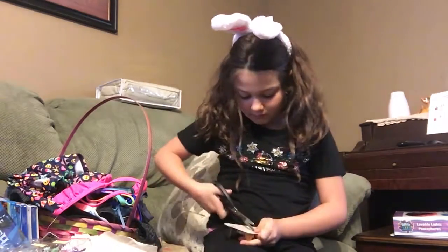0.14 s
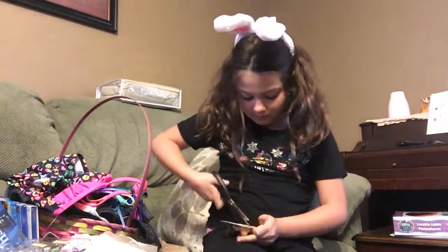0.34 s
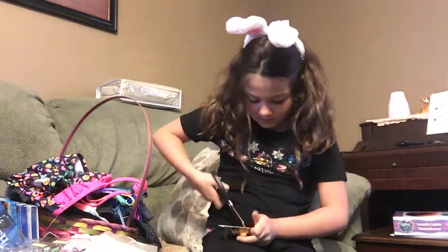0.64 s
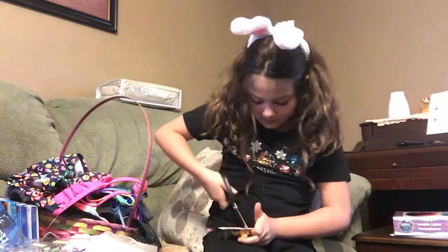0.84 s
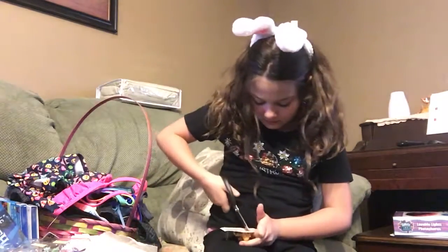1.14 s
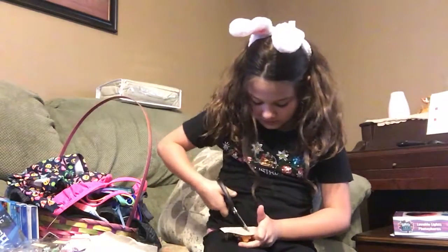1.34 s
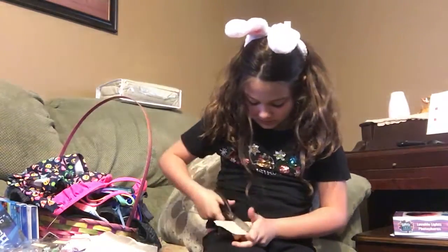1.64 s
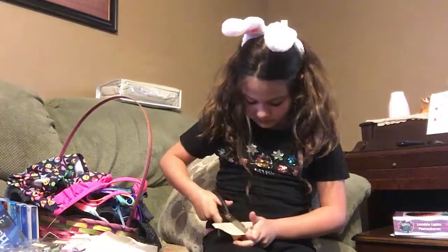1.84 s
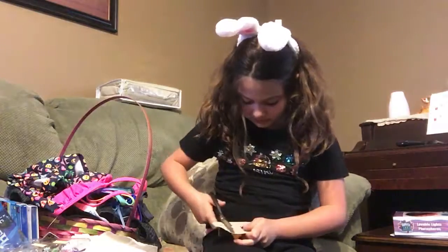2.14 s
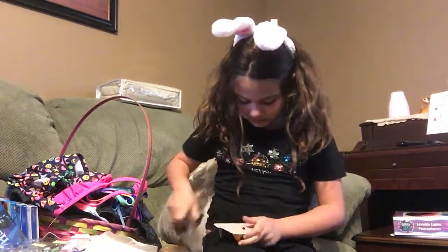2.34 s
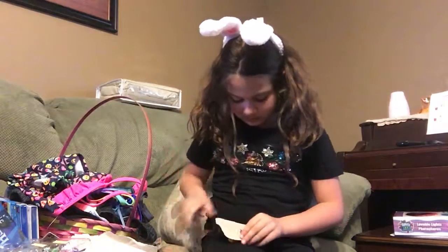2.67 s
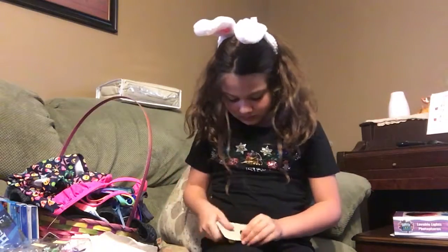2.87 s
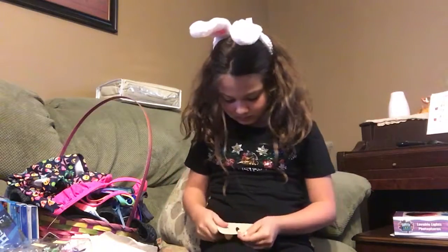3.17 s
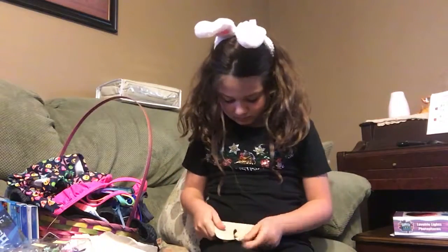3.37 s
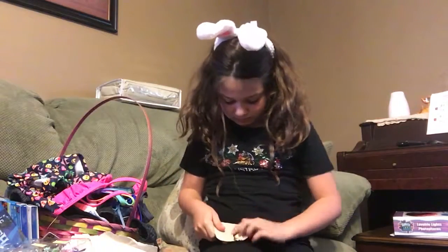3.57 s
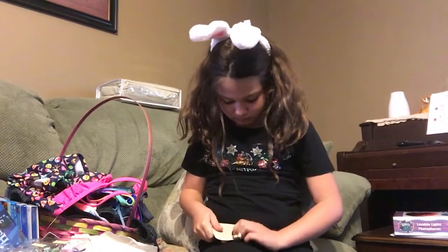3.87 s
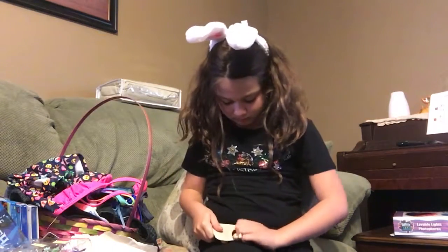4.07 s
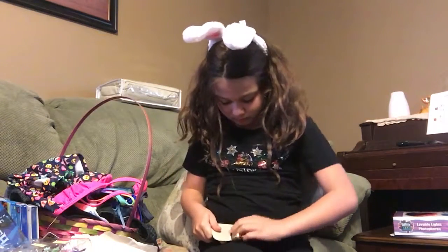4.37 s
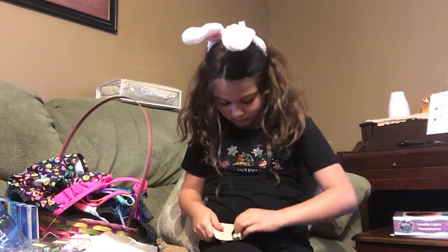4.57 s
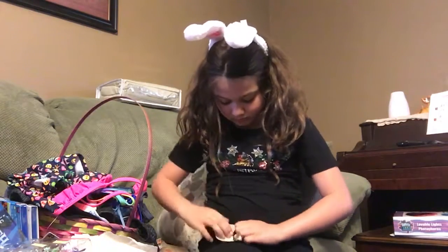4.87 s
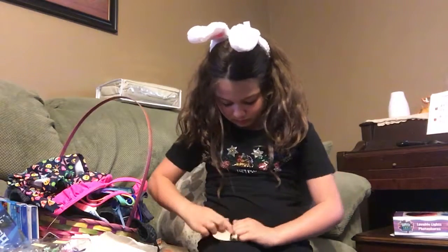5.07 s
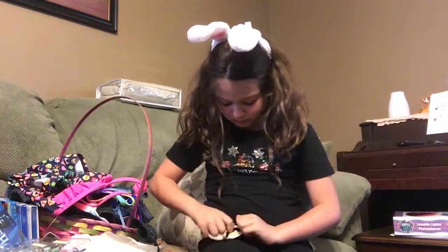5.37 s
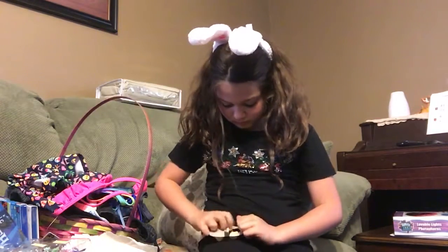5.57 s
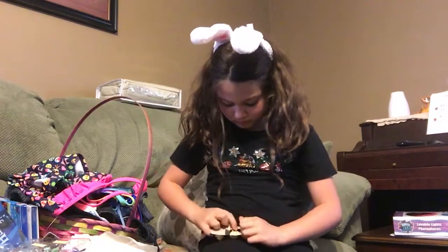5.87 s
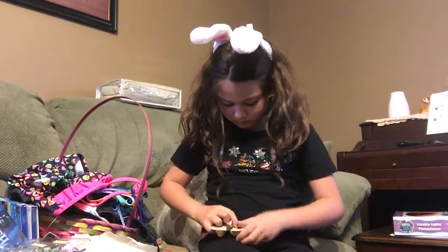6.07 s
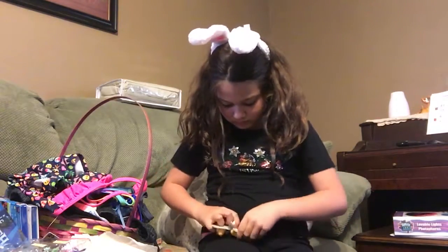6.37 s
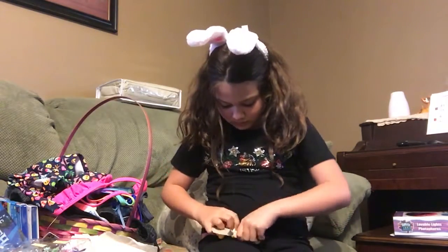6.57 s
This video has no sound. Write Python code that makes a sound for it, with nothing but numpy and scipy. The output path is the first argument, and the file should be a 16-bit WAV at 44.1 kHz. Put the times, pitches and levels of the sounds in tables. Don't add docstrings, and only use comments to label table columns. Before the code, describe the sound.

In a quiet living room, sharp snips and a soft clattering drop give way to crinkling plastic, tiny toy clicks and one loud snap.

```python
import sys
import numpy as np
from scipy import signal
from scipy.fft import rfft, irfft, next_fast_len
from scipy.io import wavfile
from scipy.ndimage import uniform_filter1d, map_coordinates

SR = 44100
rng = np.random.default_rng(int(sys.argv[2]) if len(sys.argv) > 2 else 0)


def to_wav(s):
    ch = np.atleast_2d(s).T
    pcm = np.round(np.clip(ch, -1, 1) * 32767)
    wavfile.write(sys.argv[1], SR, pcm.astype(np.int16))


def gain_from_db(level_db):
    decades = np.asarray(level_db, float) / 20
    return 10 ** decades


N = 296352


def unit(x):
    return x / np.sqrt(np.mean(x ** 2) + 1e-20)


def along(points, hz):
    f, v = np.transpose(points)
    return np.interp(np.log(hz + 1), np.log(f + 1), v)


def wobble(rate):
    return map_coordinates(rng.standard_normal(int(N * rate / SR) + 4), [np.arange(N) * rate / SR])


def swells(rows):
    t = np.arange(0, N + 64, 64) / SR
    gain = sum(gain_from_db(db) * np.exp(-((t - s) / half) ** 2) for s, half, db in rows)
    return np.interp(np.arange(N) / SR, t, gain)


def filtered(x, response):
    m = next_fast_len(x.shape[-1] + 8192)
    return irfft(rfft(x, m) * response(np.fft.rfftfreq(m, 1 / SR)), m)[..., :x.shape[-1]]


def causal(points):
    def response(hz):
        c = irfft(np.log(gain_from_db(np.maximum(along(points, hz), -70))))
        c[1:len(c) // 2] *= 2
        c[len(c) // 2 + 1:] = 0
        return np.exp(rfft(c))
    return response


def resonance(hz, centre_hz, width_hz):
    return 1j * hz * width_hz / (centre_hz ** 2 - hz ** 2 + 1j * hz * width_hz)


def coloured_noise(colour):
    return unit(filtered(rng.standard_normal(N), lambda f: gain_from_db(along(colour, f))))


# frequency_hz, t60_s
ROOM_T60 = [(300, 0.24), (1000, 0.22), (2500, 0.2), (6000, 0.19), (12000, 0.3)]
# frequency_hz, level_db
ROOM_COLOUR = [(300, 10), (2900, -0.5), (3700, -7), (6500, -2), (8500, -6.5), (15000, -8.5)]


def tail():
    hz, t, z = signal.stft(rng.standard_normal(SR // 3), SR, nperseg=256)
    decay_db = along(ROOM_COLOUR, hz)[:, None] - 60 * t / along(ROOM_T60, hz)[:, None]
    x = signal.istft(z * gain_from_db(decay_db), SR, nperseg=256)[1]
    t = np.arange(len(x)) / SR
    lumps = gain_from_db(3 * np.repeat(rng.standard_normal(len(t) // 60 + 1), 60)[:len(t)])
    walls = np.clip((t - 0.0088) / 0.000083, 0.25, 1) * (1 + 2.0 * lumps * np.exp(-(t / 0.01) ** 3))
    scatter = 1.8 * np.exp(-(t / 0.0035) ** 2)
    x = x * (walls + scatter)
    return x / np.linalg.norm(x)


def grains(rate, scatter_db, smooth, patchy_db):
    size_db = scatter_db * np.minimum(rng.exponential(size=N), 3)
    pops = (rng.random(N) < rate / SR) * gain_from_db(size_db) * rng.choice([-1, 1], N)
    z = signal.stft(unit(pops) + smooth * rng.standard_normal(N), nperseg=256)[2]
    field = uniform_filter1d(rng.standard_normal(z.shape), size=4, axis=0)
    field = uniform_filter1d(field, size=3, axis=1)
    return unit(signal.istft(z * gain_from_db(patchy_db * unit(field)), nperseg=256)[1][:N])


# frequency_hz, density_db (per Hz)
BODY = [(150, -34), (250, -26), (541, -16), (838, -25), (970, -7.5), (2180, -5.5), (2560, -5), (3050, -5),
        (4920, -13), (6000, -13), (7800, -26), (13200, -120)]
# frequency_hz, density_db (per Hz)
SHEEN = [(2650, -25.5), (4500, -3.5), (5440, -3.5), (6150, 0.5), (7930, -13.5), (8690, -10.5),
         (13700, -14.5), (16400, -32)]


def film(level, bright_db, source):
    body = unit(filtered(source, causal(BODY)))
    sheen = unit(filtered(source, causal(SHEEN)))
    return level * (body + gain_from_db(bright_db) * sheen)


# frequency_hz, level_db
THUD = [(200, -30.5), (480, -6.5), (800, -12), (1000, 4), (1250, 8.5), (1800, -8.5), (3000, -24),
        (6000, -48.5)]


def contacts(events, slip_s, thud_db, width_hz, side_share):
    out, t, f = np.zeros(N + SR), np.arange(1024) / SR, np.fft.rfftfreq(2048, 1 / SR)
    colours = [causal(points)(f) for points in (BODY, SHEEN, THUD)]
    u = t / slip_s
    for start_s, peak_db, hz, bright_db in events:
        rough = rng.standard_normal(len(t)) * u * np.exp(-u * u)
        blow = (t == 0) * 0.0003 / slip_s
        push = rfft(blow + 0.6 * rough / np.linalg.norm(rough), 2048)
        push = push / np.abs(uniform_filter1d(np.abs(push), size=40))
        broad = 0.25 * (1500 / hz) ** 2
        side = broad - 0.067 * resonance(f, 1.55 * hz, 1200) - 0.54 * resonance(f, 0.56 * hz, 390)
        ring = resonance(f, hz, width_hz) + side_share * side
        parts = [irfft(push * colour * r)[:len(t)] for colour, r in zip(colours, (ring, 1, 1))]
        low_db = thud_db - 2 * np.log2(hz / 2000) + 1.5
        hit = sum(gain_from_db(db) * p / np.abs(p).max() for db, p in zip((0, bright_db, low_db), parts))
        hit = hit + 0.09 * np.roll(hit, round(0.001154 * SR))
        wet = gain_from_db(-4) * signal.fftconvolve(hit, tail())
        at = max(round((start_s + 0.0004) * SR), 0)
        out[at:][:len(hit)] += gain_from_db(peak_db) * hit
        out[at:][:len(wet)] += gain_from_db(peak_db) * wet
    return out[:N]


# frequency_hz, density_db (per Hz)
HISS = [(82, -36), (140, -8), (167, -8), (281, -6), (463, -14), (1410, -19.5), (2560, -16), (4300, -20),
        (4760, -25.5), (5800, -21), (13900, -34.5), (15400, -34), (16400, -63)]


def hiss():
    return gain_from_db(-62.5 + 0.27 * wobble(2.05)) * coloured_noise(HISS)


# pitch_hz, level_db
HUM = [(121.3, -63), (238, -83.5), (62, -70)]


def hum():
    t, out = np.arange(N) / SR, np.zeros(N)
    for hz, db in HUM:
        level = gain_from_db(db + 1.5 * wobble(9)) * np.sqrt(2)
        out += level * np.sin(2 * np.pi * hz * t + 0.56 * wobble(5.4))
    return out


# frequency_hz, density_db (per Hz)
RUMBLE = [(12, -45), (26, -14), (44, -3), (64, 1), (90, -4.5), (130, -10.5), (200, -45)]
# middle_s, half_length_s, level_db
SHIFTS = [(0.0, 0.55, -67), (2.58, 0.17, -61), (2.82, 0.072, -61), (3.41, 0.11, -62), (3.84, 0.17, -58),
          (5.0, 0.05, -68), (5.22, 0.05, -58), (5.43, 0.089, -59), (5.63, 0.019, -48), (5.8, 0.096, -59.5),
          (6.55, 0.21, -68.5)]


def rumble():
    house = gain_from_db(-65.5)
    return (house + swells(SHIFTS)) * gain_from_db(0.71 * wobble(25)) * coloured_noise(RUMBLE)


# middle_s, half_length_s, rustle_db, brightness_db
STROKES = [(0.0, 0.089, -50, -17), (0.415, 0.066, -57.5, -23), (0.796, 0.084, -53.5, -28),
           (1.317, 0.064, -65.5, 0), (1.81, 0.06, -57, -13), (2.169, 0.058, -51.5, -15),
           (2.573, 0.13, -49, -15), (2.743, 0.092, -70, -14), (2.89, 0.12, -54.5, -8),
           (3.405, 0.03, -57.5, -7), (3.81, 0.09, -67.5, -23), (4.077, .1, -59.5, -8),
           (4.28, 0.033, -52, -9), (4.46, 0.085, -61, -2), (4.726, 0.086, -48.5, -8),
           (4.91, 0.053, -48.5, -5), (5.034, 0.096, -55, -11), (5.197, 0.13, -51, -5.5),
           (5.617, 0.056, -46, -15), (5.948, 0.081, -61.5, -3), (6.216, 0.095, -59.5, -16),
           (6.486, 0.08, -61.5, -19), (6.596, 0.047, -58, -19), (6.72, .04, -57, -3)]


def rustle():
    hold_db, hold_bright_db = -72.5, -1
    level = gain_from_db(hold_db) + swells([row[:3] for row in STROKES])
    treble = gain_from_db(hold_db + hold_bright_db)
    treble = treble + swells([(s, half, db + bright_db) for s, half, db, bright_db in STROKES])
    flicker_db = 0.84 * wobble(40) + 3.5 * wobble(130) - 5.5
    source = grains(rate=1400, scatter_db=0.5, smooth=0.92, patchy_db=1.5)
    return film(level * gain_from_db(flicker_db), 20 * np.log10(treble / level), source)


# start_s, peak_db, pitch_hz, brightness_db
KNOCKS = [
    (0.0042, -19.5, 1500, -17),
    (0.013, -20.5, 1370, -19),
]


def knocks():
    return contacts(KNOCKS, slip_s=0.0014, thud_db=-7.5, width_hz=540, side_share=0.71)


# start_s, peak_db, pitch_hz, brightness_db
CUTS = [(0.089, -46, 1040, 0), (0.694, -43, 3080, -8), (0.698, -53, 1840, -10), (0.7383, -34, 2980, -9),
        (0.8645, -45.5, 1190, -1.5), (1.2883, -37, 980, -7), (1.295, -28, 2850, -10.5),
        (1.5997, -21, 2330, -21), (1.6175, -25.5, 2490, -19), (1.628, -30, 2060, -18),
        (1.634, -28, 2160, -25), (1.649, -39, 2610, -1), (1.7843, -46, 2600, -14),
        (1.9596, -47.5, 2640, -13), (2.078, -43, 2310, -18), (2.1, -41, 1800, -4), (2.157, -42, 1840, -23)]


def cuts():
    return contacts(CUTS, slip_s=0.0023, thud_db=-13.5, width_hz=1100, side_share=0.69)


# start_s, peak_db, pitch_hz, brightness_db
SNIPS = [(0.707, -46, 2430, -1), (0.779, -14, 3570, -5), (1.028, -49.5, 2590, -19),
         (1.1334, -49, 2490, -19), (1.2042, -43.5, 2670, -25), (1.477, -40, 1050, -12),
         (1.592, -21.5, 2220, -24), (1.6065, -21, 2260, -5), (1.848, -40, 1080, -6),
         (2.046, -33.5, 3060, -9), (2.4442, -21.5, 1300, -5.5), (2.5586, -26, 2490, -33),
         (3.213, -47.5, 2490, -5), (3.265, -47, 2540, -2)]


def snips():
    return contacts(SNIPS, slip_s=0.00057, thud_db=-17, width_hz=690, side_share=1.2)


# start_s, length_s, level_db, brightness_db
TEARS = [(0.74, 0.038, -44, -6.5), (1.288, 0.018, -42, -11), (1.591, 0.073, -38, -7),
         (2.042, 0.14, -52, -8), (2.452, 0.082, -44, -10.5), (2.913, 0.063, -50.5, -6),
         (4.041, 0.024, -38, -5), (4.847, 0.1, -55, -6), (5.099, 0.037, -41.5, -11),
         (5.17, 0.035, -45.5, -29), (5.582, 0.05, -50, -13)]


def tears():
    t, level, treble = np.arange(N) / SR, np.zeros(N), np.zeros(N)
    for s, length, db, bright_db in TEARS:
        shape = np.clip((t - s) / 0.0029, 0, 1) * np.exp(-np.clip((t - s) / length, 0, 9) ** 1.9)
        level += gain_from_db(db) * shape
        treble += gain_from_db(db + bright_db) * shape
    stutter = gain_from_db(0.74 * wobble(150))
    source = grains(rate=4000, scatter_db=2.5, smooth=0.64, patchy_db=4.0)
    return film(level * stutter, 20 * np.log10((treble + 1e-9) / (level + 1e-9)), source)


def hollow(modes):
    def response(f):
        total = sum((-1) ** k * gain_from_db(db) * resonance(f, c, w) for k, (c, w, db) in enumerate(modes))
        return total / (1 + 1j * f / 1500) ** 2
    return response


# peak_s, boxes_db, cushion_db
DROP = [
    (2.445, -42, -41.5),
    (2.499, -45, -46.5),
    (2.56, -66, -69),
    (2.648, -48.5, -56),
    (2.765, -60.5, -58.5),
    (2.847, -61, -57),
    (2.96, -66.5, -72),
]
# pitch_hz, width_hz, level_db
PILE = [(372.5, 9.6, -3.5), (597, 29, -5.5), (690, 66, -14), (790, 20, -10), (463, 5000, -15)]
# pitch_hz, width_hz, level_db
CUSHION = [(102, 12, 0.5), (199.5, 18, 4)]


def drop():
    t, boxes, cushion = np.arange(N) / SR, np.zeros(N), np.zeros(N)
    for s, boxes_db, cushion_db in DROP:
        rise = np.clip((t - s) / 0.042 + 1, 0, 1) ** 2
        shape = rise * gain_from_db(-177 * np.abs(t - s))
        boxes += gain_from_db(boxes_db) * shape
        cushion += gain_from_db(cushion_db) * shape
    source = grains(rate=720, scatter_db=0.5, smooth=1.73, patchy_db=4.0)
    shake = boxes * unit(filtered(source, hollow(PILE))) + cushion * unit(filtered(source, hollow(CUSHION)))
    return shake * (t > 2.443)


# start_s, peak_db, pitch_hz, brightness_db
BAGS = [
    (2.4453, -27.5, 1290, -10),
    (2.455, -33, 1210, -25),
    (2.4847, -34, 1900, -5),
    (2.602, -35, 1810, -7),
    (2.823, -43.5, 1650, -0.5),
    (2.8374, -46, 2400, 0),
    (2.9043, -37, 1120, -7),
    (2.925, -35.5, 2310, -30),
    (3.092, -43, 2150, -9),
]


def bags():
    return contacts(BAGS, slip_s=0.0019, thud_db=-10.5, width_hz=560, side_share=0.94)


# start_s, peak_db, pitch_hz, brightness_db
CREASES = [(3.6035, -36, 3080, -13), (3.612, -42, 1940, -5), (3.725, -48, 3100, -24),
           (4.046, -30, 3100, -8), (4.263, -45.5, 960, -3), (4.401, -47, 1620, -19),
           (4.7575, -38, 1660, -10), (4.889, -37, 1170, -12), (4.936, -34.5, 1740, -1),
           (4.9894, -49, 3190, 4), (5.0885, -37, 3040, -29), (5.1721, -41, 2900, -7),
           (5.197, -33.5, 3750, -18), (5.4787, -25, 1430, -24), (5.4882, -23.5, 1740, -2),
           (5.6, -43, 2600, -30), (5.611, -29.5, 1730, -27), (5.627, -29.5, 1250, -30),
           (6.2365, -40.5, 2700, -13), (6.2516, -37.5, 1860, -18), (6.393, -53, 1780, 2),
           (6.481, -40.5, 1890, -26), (6.6777, -47, 2840, -10), (6.707, -42.5, 6240, -13)]


def creases():
    return contacts(CREASES, slip_s=0.0025, thud_db=-11.5, width_hz=630, side_share=0.62)


# start_s, peak_db, pitch_hz, brightness_db
TICKS = [
    (3.618, -28.5, 3060, -15),
    (4.3, -41, 3000, -8),
    (5.9257, -28, 3230, -3),
    (6.1365, -36, 3180, -19),
]


def ticks():
    return contacts(TICKS, slip_s=0.001, thud_db=-17, width_hz=240, side_share=0.25)


# start_s, peak_db, pitch_hz, brightness_db
PIECES = [(3.7364, -38.5, 1510, -5.5), (3.9266, -17, 2400, -19), (3.983, -53, 2450, -17),
          (4.0244, -42.5, 2450, 1), (4.034, -50, 3170, 4), (4.352, -39, 1130, -21),
          (4.364, -35.5, 3220, -7), (4.6553, -32, 2930, -13), (4.7035, -31.5, 3020, -8),
          (4.7092, -29.5, 1410, -6), (4.77, -48, 3020, -8), (4.8703, -38.5, 3520, -4),
          (4.9014, -34.5, 3520, -5), (5.1116, -19.5, 2610, -5), (5.268, -41.5, 3200, 1.5),
          (5.301, -34, 2780, -4), (5.3137, -18.5, 2530, -6.5), (5.3333, -30.5, 1930, -17),
          (5.3805, -53, 2200, -10), (5.677, -34, 2600, -10), (5.746, -41.5, 3270, -12),
          (5.9205, -39, 1620, -8), (6.2665, -39.5, 1980, -9), (6.692, -46, 3000, -2), (6.17, -40, 1980, -4),
          (6.4633, -34, 2560, -17), (6.4689, -30.5, 3760, -13), (6.57, -36.5, 3400, -4.5)]


def pieces():
    return contacts(PIECES, slip_s=0.00051, thud_db=-19, width_hz=1170, side_share=0.99)


# start_s, peak_db, pitch_hz, brightness_db
SNAP = [
    (5.5214, -7, 3050, -9),
]


def snap():
    return contacts(SNAP, slip_s=0.00048, thud_db=-55, width_hz=890, side_share=0.36)


def scene():
    floor = hiss() + hum() + rumble()
    hands = rustle() + tears() + drop()
    wet = gain_from_db(-6.5) * signal.fftconvolve(hands, tail())[:N]
    clicks = knocks() + cuts() + snips() + bags() + creases() + ticks() + pieces() + snap()
    return (clicks + hands + wet + floor)[None]


def low_pass(x):
    return signal.sosfilt(signal.butter(12, 16500, fs=SR, output="sos"), x)


def record(dry):
    top_hz = 16300
    return low_pass(filtered(dry, lambda hz: hz < top_hz))


dry = scene()
out = record(dry)
to_wav(out)
```